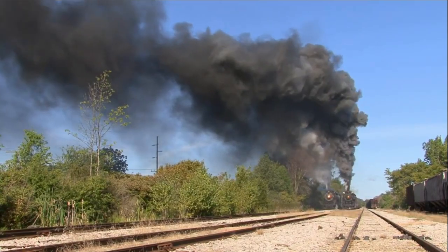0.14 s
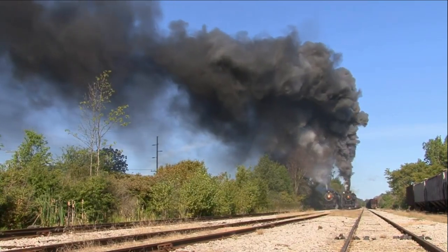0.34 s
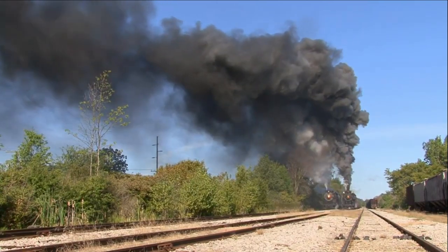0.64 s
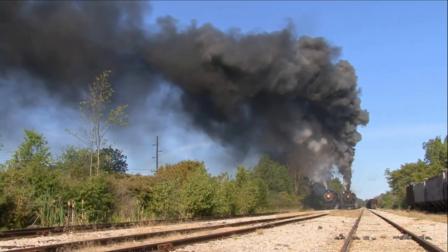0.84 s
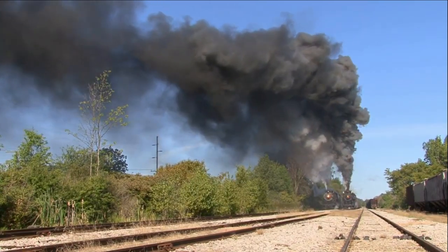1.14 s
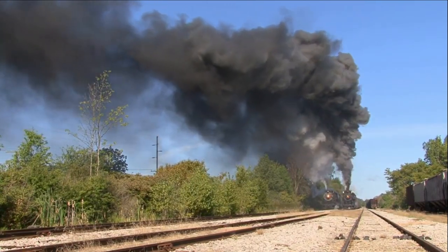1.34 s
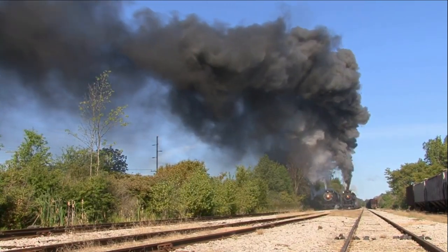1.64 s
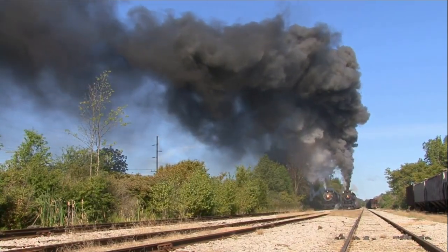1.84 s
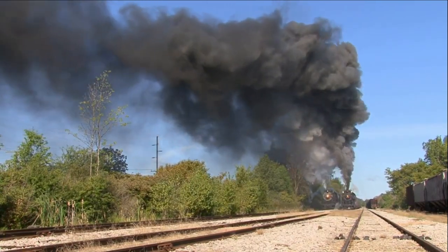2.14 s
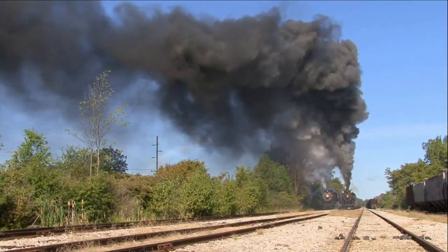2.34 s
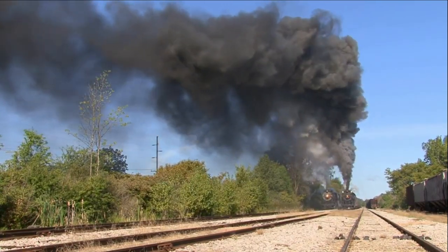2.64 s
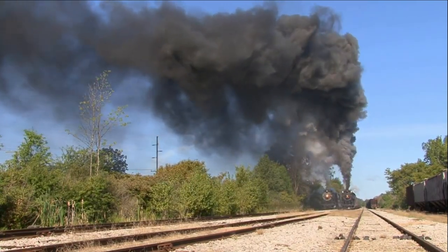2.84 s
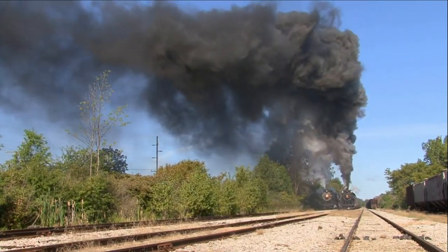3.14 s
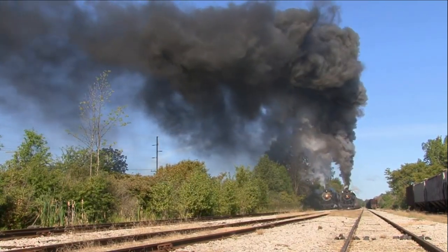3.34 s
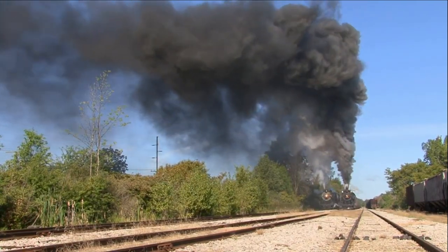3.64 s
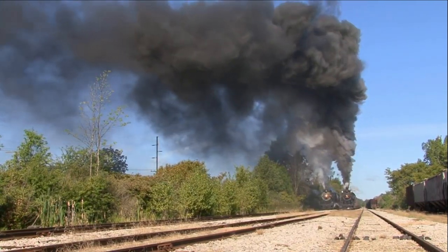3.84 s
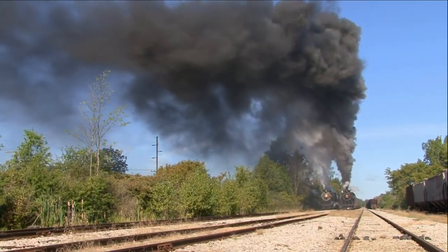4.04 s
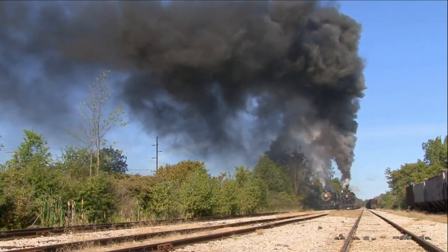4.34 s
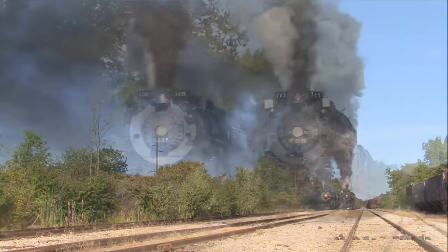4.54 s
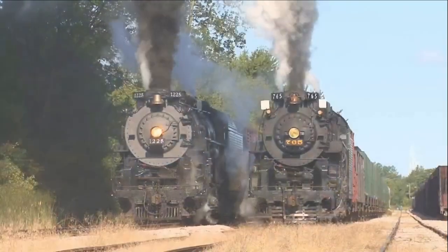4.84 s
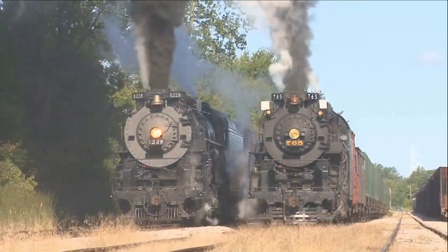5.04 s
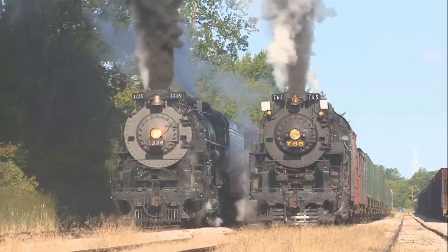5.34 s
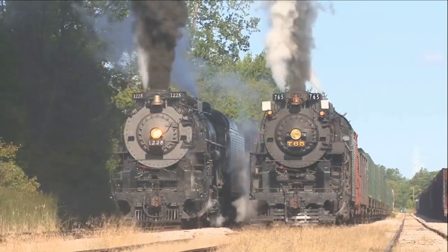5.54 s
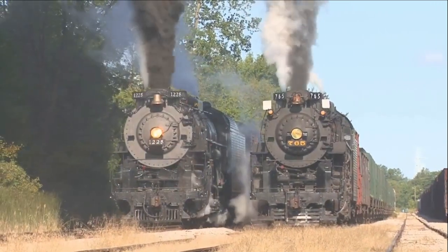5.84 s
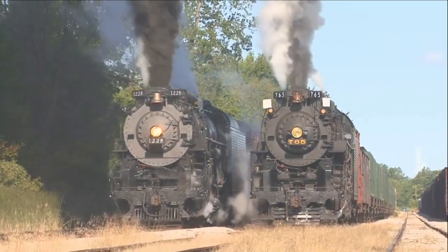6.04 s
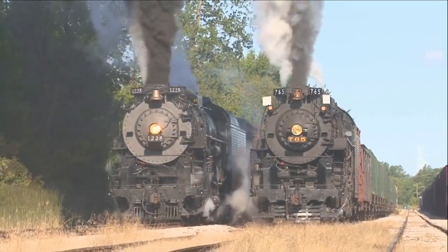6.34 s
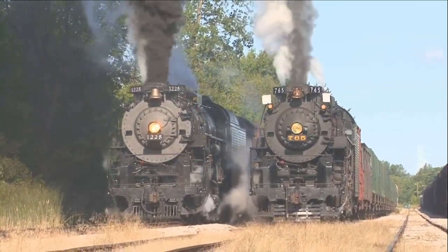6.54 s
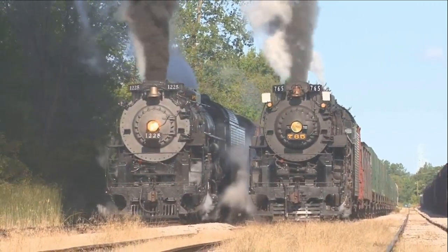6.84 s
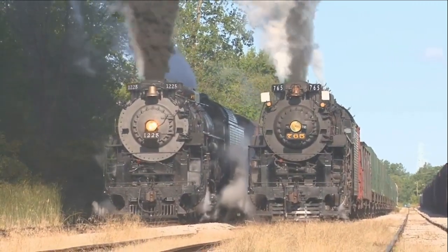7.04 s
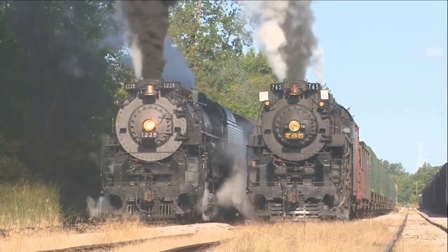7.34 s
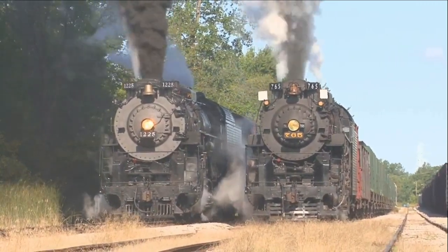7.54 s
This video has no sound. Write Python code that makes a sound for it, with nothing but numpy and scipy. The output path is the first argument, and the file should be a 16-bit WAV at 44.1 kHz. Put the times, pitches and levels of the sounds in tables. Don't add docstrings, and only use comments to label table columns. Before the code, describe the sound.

Two steam locomotives work hard in a tree-lined rail yard, heard from afar by a fixed microphone, almost mono. From 0 s, heavy exhaust chuffs fall about every half second, each a rough, crackling midrange burst of just over a tenth of a second, with a thin hiss and a low, hollow stack boom. Trees throw back a short, diffuse echo. Around 2 to 2.5 s the beats turn harder and louder. From about 4.5 s the sound opens: a breathy early puff appears, hiss brightens, and leaking steam rises. From 4.8 s a much softer second engine chuffs between the main beats, making an alternating loud-soft pattern. The main beats slow slightly to gaps of nearly 0.6 s. Tree echo fades while freight cars and yard answer. The soft beats grow fainter and boomier toward 7.5 s, with steam washing underneath throughout.

```python
import sys
import numpy as np
from scipy import signal
from scipy.fft import rfft, irfft, next_fast_len
from scipy.io import wavfile
from scipy.ndimage import uniform_filter1d

SR = 44100
rng = np.random.default_rng(int(sys.argv[2]) if len(sys.argv) > 2 else 0)


def rack_gain(trim_db):
    fader = np.asarray(trim_db, float)
    return 10 ** (fader / 20)


def wav_out(sig):
    wavfile.write(sys.argv[1], SR, np.round(np.clip(np.atleast_2d(sig).T, -1, 1) * 32767).astype(np.int16))


N = 339129
TIME = np.arange(N) / SR
FRAME_S, BIN_HZ = np.arange(N // 128 + 5) * 128 / SR, np.fft.rfftfreq(512, 1 / SR)

# (time [s], jet level [dB], blast length [s], ground echo delay [ms], ground echo depth [dB])
LOUD_BEATS = [(-.012, -24.5, .12, .83, 2), (0.48, -21, 0.12, 0.58, -1.5), (0.962, -22.5, 0.12, 0.42, 5.5),
              (1.469, -23, 0.13, 0.53, 4), (1.975, -19.5, 0.13, 0.52, 4), (2.467, -15.5, 0.11, 0.61, 3),
              (2.956, -16.5, 0.1, 0.66, 1.5), (3.471, -17, .12, .21, 2.5), (3.983, -17.5, 0.12, 0.38, 3.5),
              (4.48, -17.5, 0.11, .27, 0.7), (5.013, -16.5, 0.13, 0.29, 2.5), (5.555, -17.5, 0.12, 0.58, 2),
              (6.098, -19, 0.12, 0.98, 0.7), (6.677, -18, .12, 1, 1.2), (7.239, -18.5, .12, 0.31, 3)]
# (time [s], jet level [dB], rise [s], blast length [s], boom level re jet [dB])
SOFT_BEATS = [
    (1.424, -43.5, 0.016, 0.074, -5.5),
    (4.448, -31, .002, 0.17, -38),
    (4.977, -24, 0.0029, 0.04, -20),
    (4.842, -31.5, 0.0072, 0.096, -10.5),
    (5.341, -30, 0.0097, 0.12, -11),
    (5.817, -31.5, 0.016, 0.11, -11.5),
    (6.337, -33, 0.015, 0.12, -10.5),
    (6.923, -35, 0.01, 0.12, -5.5),
    (7.451, -34.5, .02, 0.11, -6.5),
]
# (frequency [Hz], density [dB per Hz])
JET_COLOUR = [(250, -68), (330, -21), (470, -8), (750, -11.5), (1050, -6), (1550, -4.5), (2250, -2.5),
              (2900, -2), (3300, -4), (3600, -12), (4200, -17.5), (5400, -85)]
# (frequency [Hz], gain [dB])
SOFT_TINT = [(500, 2), (900, -1), (1400, 1.5), (2200, 0), (3200, 0)]
# (frequency [Hz], density [dB per Hz])
HISS_COLOUR = [(3000, -25), (4000, -1), (5300, 0), (6600, -2), (8500, -11), (10000, -19), (11000, -26),
               (11800, -31), (15000, -41)]
# (frequency [Hz], width [Hz], level [dB])
LOUD_STACK = [(99, 16, -23), (135.4, 56, 1), (198.3, 17.6, -4.5), (250.7, 37, 1.5), (387, 31, -6),
              (493.4, 99, -15)]
# (frequency [Hz], width [Hz], level [dB])
SOFT_STACK = [(106, 38, -24.5), (139.4, 40, 4), (173.6, 19, -2), (263, 39, -8)]
# (time [s], level from the trees [dB], level from the yard [dB])
ECHO_LEVELS = [
    (0, -12.5, -14.5),
    (1.2, -11.5, -25),
    (3.8, -11.5, -17),
    (4.6, -16.5, -13),
    (5.6, -20.5, -13),
    (7.5, -23.5, -9.5),
]
# (frequency [Hz], gain [dB])
ECHO_COLOUR = [(100, -6), (300, -8.5), (550, -1.5), (900, 3.5), (3000, 3), (4500, 6.5), (7000, -5.5),
               (11000, -3.5)]
# (time [s], level [dB])
LEAK_LEVELS = [
    (0, -42.5),
    (3.9, -41.5),
    (4.5, -37),
    (6, -36.5),
    (7.7, -40),
]
# (frequency [Hz], density [dB per Hz])
LEAK_COLOUR = [(24, -56), (40, -43.5), (125, 1.5), (249, -7.5), (431, -9), (1060, 0.5), (1590, 0),
               (3090, 2.5), (4320, -15.5), (5350, -15), (9020, -36), (10400, -32.5), (11700, -42),
               (15200, -67.5), (22000, -120)]
# (frequency [Hz], side level re middle [dB])
SIDE_COLOUR = [(30, -10), (100, -35), (300, -30.5), (1000, -31), (2500, -24.5), (4000, -21.5),
               (7000, -17.5), (11000, -7.5)]
# (frequency [Hz], density [dB per Hz])
MIC_HISS = [(30, -10), (300, -10), (8000, 0), (14500, 0), (16000, -30)]

USUAL_DB = -19
RISE_S, RISE_DB_PER_DB = 0.013, -0.27
BOOM_DB, BOOM_DB_PER_S, BOOM_FOLLOWS = -37.5, 0.34, 0.39
UPPER_DB, UPPER_DB_PER_S = -2, 0.4
HISS_DB, HISS_DB_PER_S, NEAR_S, SOFT_HISS_DB = -15, 1.62, 4.77, -16
GROUND_FROM_HZ, GROUND_FADE_HZ = 260, 3400
LOW_HZ, LOW_EVENS, LOW_DB_PER_S = 550, 0.8, 0.56
TREES_S, TREES_SWELL_DB_PER_S, TREES_FALL_DB_PER_S = 0.2, 30, 188
FAR_DB, FAR_DB_PER_S = -18, 41
YARD_DB_PER_S = 50.5


def exhaust():
    s, db, length = np.transpose(LOUD_BEATS)[:3]
    harder_db = db - USUAL_DB
    loud = np.transpose([s, db, RISE_S * rack_gain(RISE_DB_PER_DB * harder_db), length])
    soft = np.array(SOFT_BEATS)
    both = np.vstack([loud, soft[:, :4]])

    crackle = evened(rack_gain(0.21 * wander(hz=252) + 0.18 * wander(hz=35)))
    roar = patchy(JET_COLOUR, patchy_db=2.0) + 0.34 * shocks(per_s=400, spread_db=2.5)
    soft_roar = colour(roar[::-1], SOFT_TINT)
    jet = 0
    for beats, noise in ((loud, roar), (soft, soft_roar)):
        jet = jet + noise * blasts(beats, np.zeros(len(beats)), lag=0.0015, slow=0.67, build=0.2, fall_db=192.5)

    loud_hiss_db = HISS_DB + HISS_DB_PER_S * np.maximum(s - NEAR_S, 0)
    hiss_db = np.append(loud_hiss_db, np.full(len(soft), SOFT_HISS_DB))
    hiss = blasts(both, hiss_db, lag=0.0016, slow=0.91, build=0.39, fall_db=150)
    hiss = hiss * patchy(HISS_COLOUR, patchy_db=1.5)

    boom_db = BOOM_DB + BOOM_DB_PER_S * s + BOOM_FOLLOWS * harder_db - db
    boom = blasts(loud, boom_db, lag=0.002, slow=0.32, build=0.045, fall_db=130, linger=0.011)
    boom = boom * stack(LOUD_STACK, steady=0.046, upper_db=UPPER_DB + UPPER_DB_PER_S * TIME)
    thump = blasts(soft, soft[:, 4], lag=0.013, slow=0.6, build=0.18, fall_db=264, linger=0.019)
    thump = thump * stack(SOFT_STACK, steady=0.98, upper_db=7)
    return (jet + hiss) * crackle + boom + thump


def blasts(beats, extra_db, lag, slow, build, fall_db, linger=0):
    s, db, rise, length = np.transpose(beats)[:4, :, None]
    since = TIME[::64] - s - lag
    opening = rack_gain(np.clip(7 - 11 * since / (slow * rise + 0.002), -60, 90))
    growing = 1 - build * np.exp(-np.maximum(since, 0) / 0.077)
    closing = rack_gain(np.clip(6.5 + fall_db * (since - length - linger), -60, 90))
    power = (rack_gain(db + extra_db[:, None]) * growing) ** 2
    power = power / (1 + opening ** 2) / np.sqrt(1 + closing ** 4)
    return np.interp(TIME, TIME[::64], np.sqrt(power.sum(0)))


def shocks(per_s, spread_db):
    size = rack_gain(spread_db * np.minimum(rng.exponential(1, N), 3)) * rng.choice([-1., 1.], N)
    struck = rng.random(N) < per_s / SR
    return evened(colour(size * struck, JET_COLOUR))


def stack(modes, steady, upper_db):
    draught, pipe = rng.standard_normal(N), 0
    for hz, width, db in modes:
        peak = signal.iirpeak(hz, hz / width, SR)
        ring = evened(signal.lfilter(*peak, signal.lfilter(*peak, draught)))
        ring = ring / (uniform_filter1d(ring ** 2, size=700) + 0.05) ** (steady / 2)
        pipe = pipe + rack_gain(db + upper_db * (hz > 220)) * evened(ring)
    return evened(pipe)


def ground(x):
    s, db, length, delay_ms, depth_db = np.transpose(LOUD_BEATS)
    hz = BIN_HZ[:, None]
    turns = np.outer(BIN_HZ, delay_ms) / 1000
    comb = -depth_db * np.cos(2 * np.pi * turns)
    comb = comb / (1 + (hz / GROUND_FADE_HZ) ** 4 + (GROUND_FROM_HZ / (hz + 1)) ** 4)
    low_db = LOW_DB_PER_S * (s - s.mean()) - LOW_EVENS * (db - USUAL_DB)
    comb = comb + low_db / (1 + (hz / LOW_HZ) ** 4)
    z = signal.stft(x, nperseg=512, noverlap=384)[2]
    bend_db = np.array([np.interp(FRAME_S[:z.shape[1]], s + length / 2, row) for row in comb])
    return signal.istft(z * rack_gain(bend_db), nperseg=512, noverlap=384)[1][:N]


def echoes(x):
    at = np.arange(400, SR - 20, 20) + rng.integers(0, 20, (2, (SR - 401) // 20))
    trees_s, yard_s = at / SR
    near_db = TREES_SWELL_DB_PER_S * np.minimum(trees_s, TREES_S)
    near_db = near_db - TREES_FALL_DB_PER_S * np.maximum(trees_s - TREES_S, 0)
    trees_db = np.maximum(near_db, FAR_DB - FAR_DB_PER_S * trees_s)
    yard_db = -YARD_DB_PER_S * yard_s
    even = x * rack_gain(USUAL_DB - np.interp(TIME, *np.transpose(LOUD_BEATS)[:2]))
    s, *levels = np.transpose(ECHO_LEVELS)
    back = 0
    for place, profile_db, level_db in zip(at, (trees_db, yard_db), levels):
        taps = np.zeros(SR)
        taps[place] = rng.choice([-1., 1.], place.shape) * rack_gain(profile_db)
        sent = even * rack_gain(np.interp(TIME, s, level_db))
        back = back + signal.fftconvolve(sent, taps / np.linalg.norm(taps))[:N]
    return colour(back, ECHO_COLOUR)


def leak():
    level_db = np.interp(TIME, *np.transpose(LEAK_LEVELS)) + 0.27 * wander(hz=4.2)
    return patchy(LEAK_COLOUR, patchy_db=2.0) * rack_gain(level_db)


def patchy(points, patchy_db):
    a, b, patches = rng.standard_normal((len(FRAME_S), 257, 3)).T
    patches = uniform_filter1d(patches, size=7, axis=0)
    patches = evened(uniform_filter1d(patches, size=24, axis=1))
    z = (a + 1j * b) * rack_gain(read(points, BIN_HZ)[:, None] + patchy_db * patches)
    return evened(signal.istft(z, nperseg=512, noverlap=384)[1][:N])


def wander(hz):
    lowpass = signal.butter(2, hz, fs=SR, output="sos")
    return evened(signal.sosfilt(lowpass, rng.standard_normal(N)))


def colour(x, points):
    size = next_fast_len(x.shape[-1])
    gain = rack_gain(read(points, np.fft.rfftfreq(size, 1 / SR)))
    return irfft(rfft(x, size) * gain, size)[..., :x.shape[-1]]


def read(points, hz):
    f, value = np.transpose(points)
    return np.interp(np.log(hz + 1), np.log(f + 1), value)


def evened(x):
    return x / np.sqrt(np.mean(x ** 2) + 1e-20)


def scene():
    engines = exhaust()
    middle = ground(engines) + echoes(engines) + leak()
    scatter = rng.standard_normal(3000) * rack_gain(-np.arange(3000) / 60)
    scattered = signal.oaconvolve(middle, scatter / np.linalg.norm(scatter))[:N]
    side = colour(0.77 * scattered - 0.55 * middle, SIDE_COLOUR)
    return np.array([middle + side, middle - side])


def thinned(x, loud, limit_db, share, tilt_db, whim_db, low_hz, size):
    hz, _, z = signal.stft(x, SR, nperseg=2048, noverlap=1024)
    loud_z = signal.stft(loud, SR, nperseg=2048, noverlap=1024)[2]
    frame_db = 10 * np.log10((abs(loud_z) ** 2).sum(0) + 1e-12)
    band_db = 10 * np.log10(uniform_filter1d(abs(z) ** 2, size=size, axis=0) + 1e-20)
    limit = limit_db + share * (frame_db + 27.5) + whim_db * rng.standard_normal(len(frame_db))
    tilted_db = band_db + tilt_db * abs(np.log2(hz / 2500 + 0.01))[:, None]
    keep = (tilted_db > limit) | (hz < low_hz)[:, None]
    return signal.istft(z * keep, SR, nperseg=2048, noverlap=1024)[1][:N]


def band_limit(x):
    return signal.sosfilt(signal.butter(12, 14800, fs=SR, output="sos"), x)


def record(dry):
    hiss = rack_gain(-76) * evened(colour(rng.standard_normal(N), MIC_HISS))
    bass_cut = signal.butter(3, 62, "high", fs=SR, output="sos")
    left, right = signal.sosfilt(bass_cut, dry + hiss)
    middle, side = (left + right) / 2, (left - right) / 2
    side = thinned(side, middle, limit_db=-73, share=0.05, tilt_db=7, whim_db=5, low_hz=60, size=16)
    middle = thinned(middle, middle, limit_db=-89, share=0.88, tilt_db=0, whim_db=1, low_hz=9200, size=1)
    return band_limit(np.array([middle + side, middle - side]))


dry = scene()
out = record(dry)
wav_out(out)
```